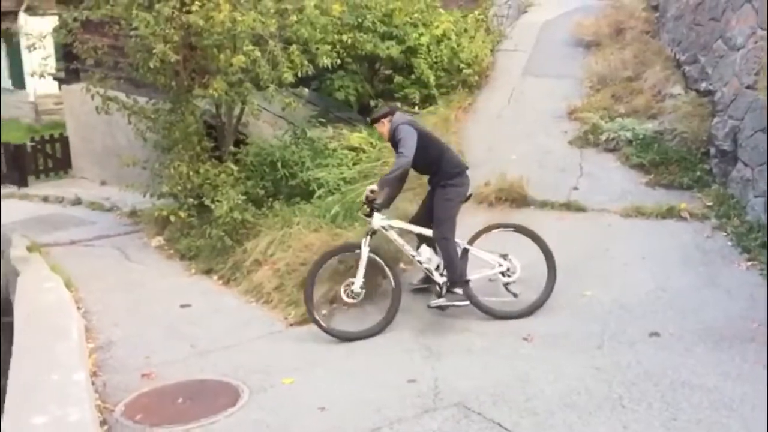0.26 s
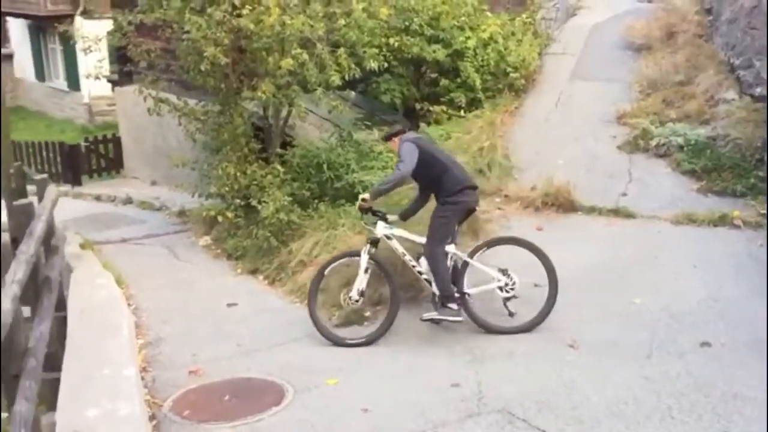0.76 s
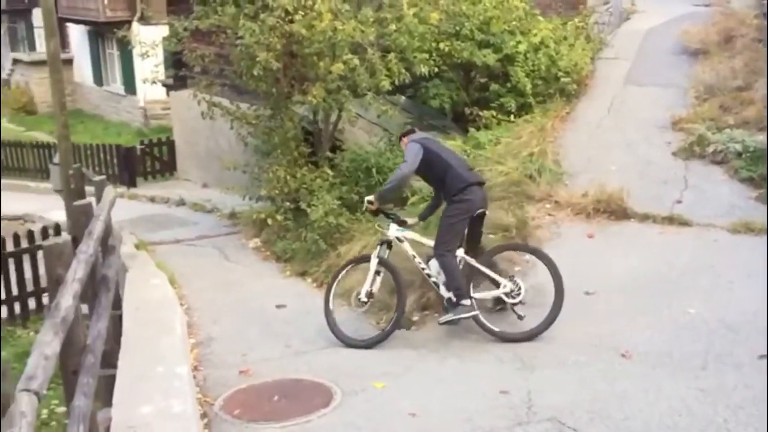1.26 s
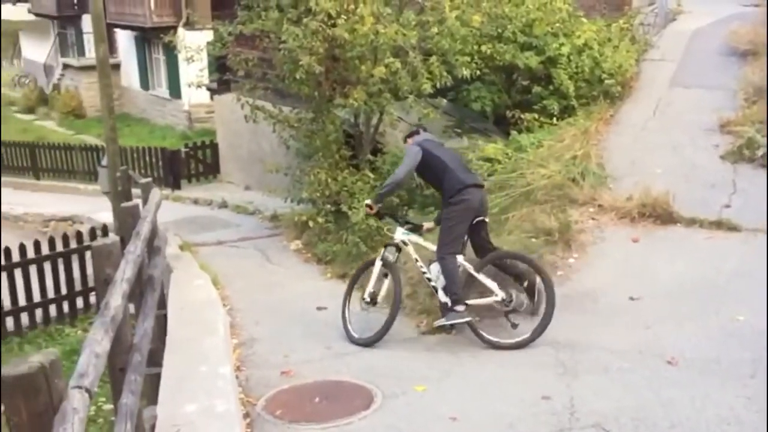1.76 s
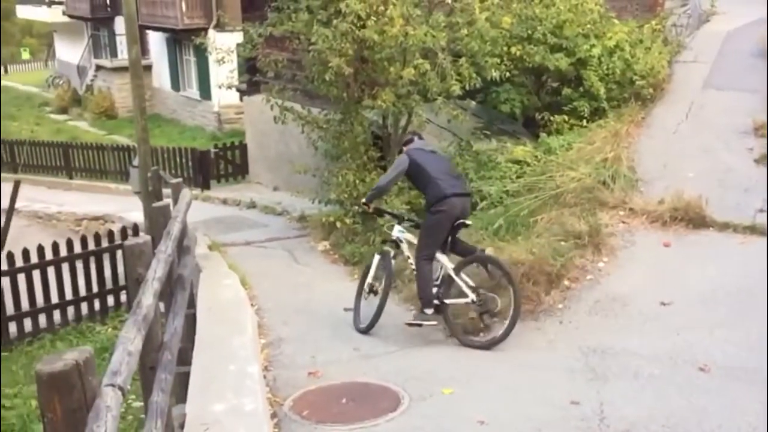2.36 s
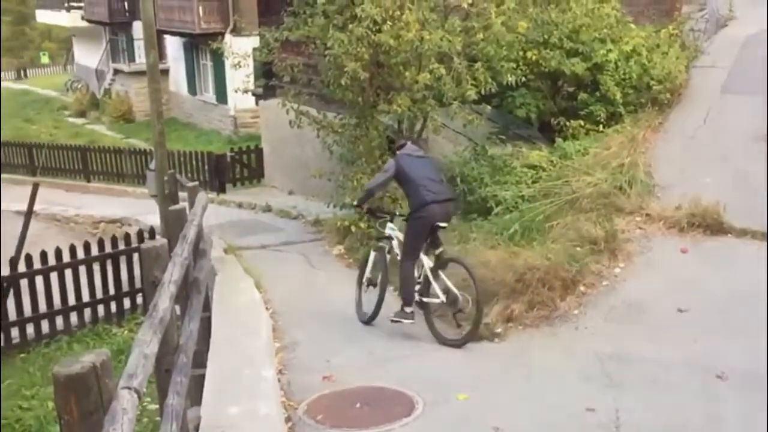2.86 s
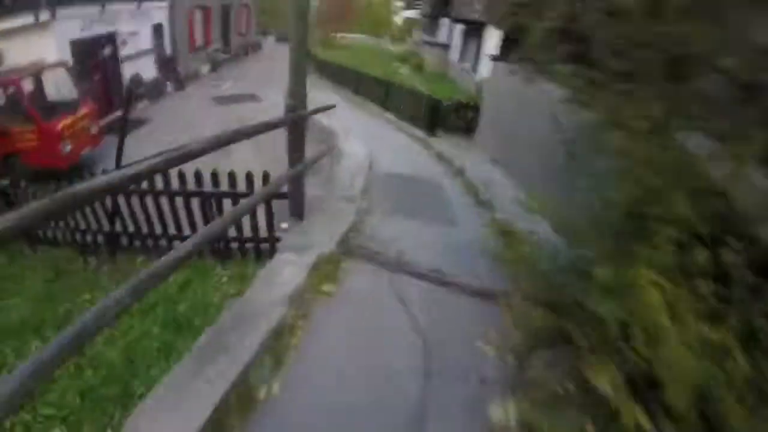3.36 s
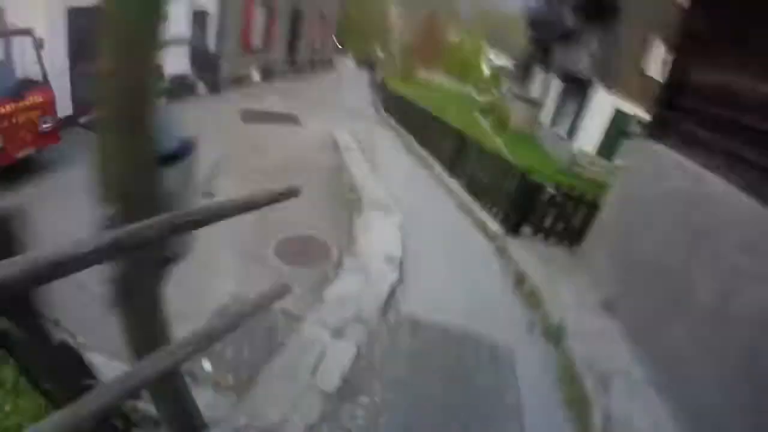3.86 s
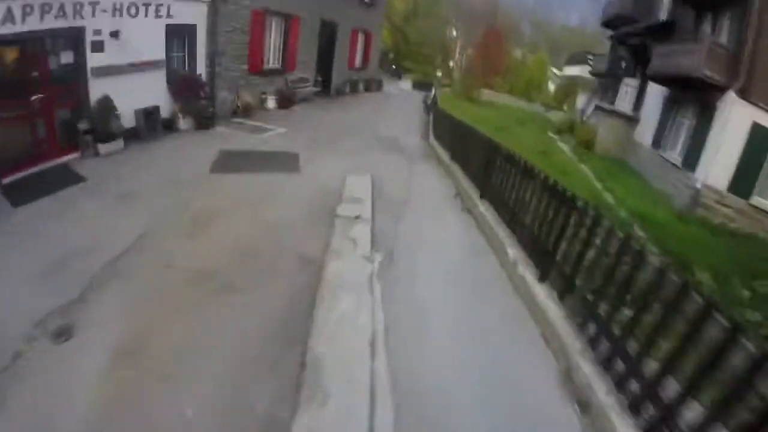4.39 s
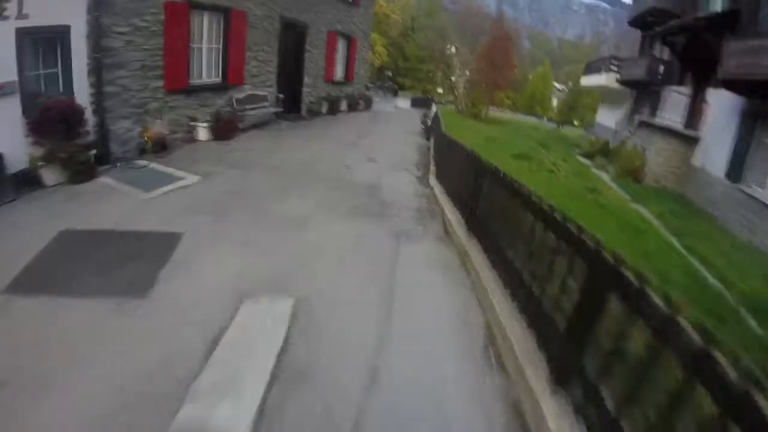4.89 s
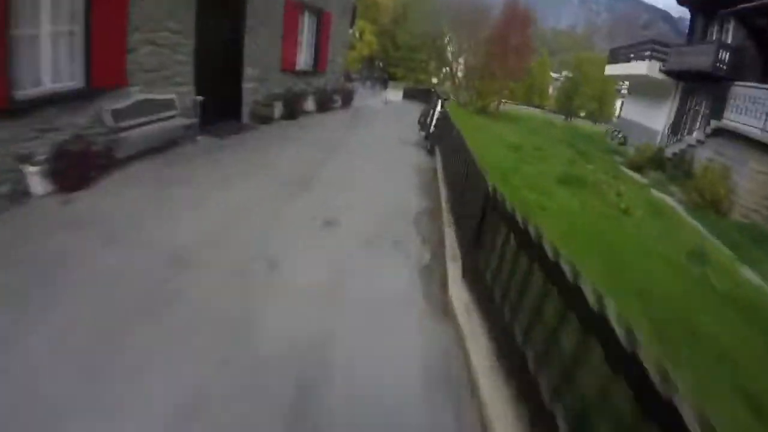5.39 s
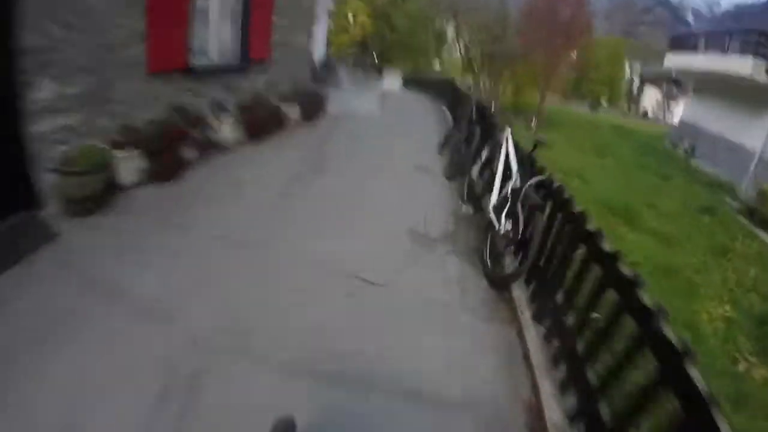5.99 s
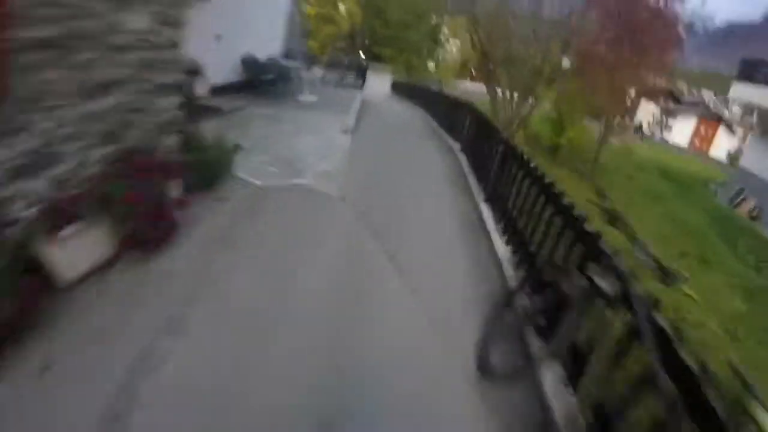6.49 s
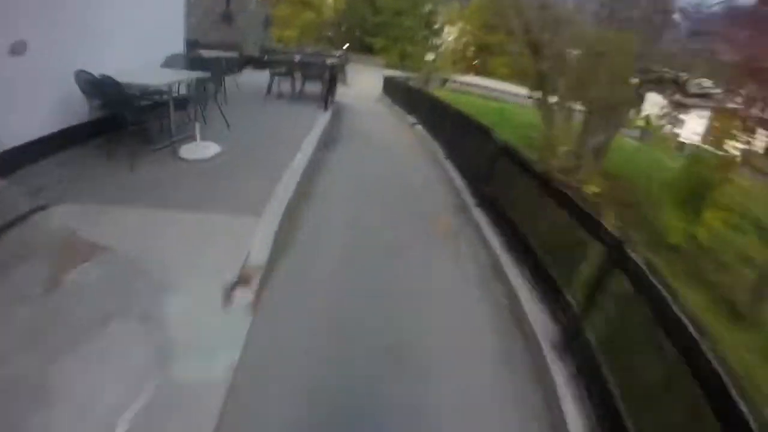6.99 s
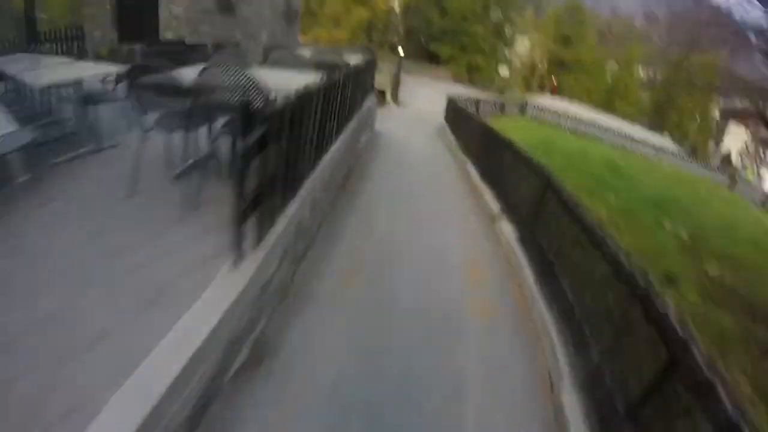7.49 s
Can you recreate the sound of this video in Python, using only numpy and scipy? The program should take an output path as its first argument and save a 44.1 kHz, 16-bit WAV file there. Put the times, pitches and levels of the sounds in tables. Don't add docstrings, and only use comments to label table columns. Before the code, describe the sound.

A mountain bike turns with muffled grinding, knocks and metallic clangs, then low thumps, thin hiss and plasticky clicks shake a housed microphone rolling downhill.

```python
import sys
import numpy as np
from scipy import signal
from scipy.io import wavfile
from scipy.ndimage import uniform_filter1d

SR = 44100
rng = np.random.default_rng(int(sys.argv[2]) if len(sys.argv) > 2 else 0)


def amp(db):
    return 10 ** (np.asarray(db, float) / 20)


def write(x):
    x = np.atleast_2d(x).T
    wavfile.write(sys.argv[1], SR, np.round(np.clip(x, -1, 1) * 32767).astype(np.int16))


N = 341364
LEAD_SAMPLES = 130


def rms_one(x):
    return x / np.sqrt(np.mean(x ** 2) + 1e-20)


def in_time(rows):
    s, *columns = np.transpose(rows)
    return [np.interp(np.arange(N) / SR, s, c) for c in columns]


def swells(rows, length_s):
    s, *columns = np.transpose(rows)
    coarse_s = np.arange(0, N, 40) / SR
    bells = np.exp(-.5 * ((coarse_s - s[:, None]) / length_s) ** 2)
    return [np.interp(np.arange(N) / 40, np.arange(len(coarse_s)), c @ bells) for c in columns]


def at_hz(points, hz):
    table_hz, table_db = np.transpose(points)
    return np.interp(np.log(hz), np.log(table_hz), table_db)


def drift(rate_hz):
    r = np.exp(-80 * np.pi * rate_hz / SR)
    slow = signal.lfilter([1], [1, -2 * r, r * r], rng.standard_normal(N // 40 + 2002))[2000:]
    return np.interp(np.arange(N) / 40, np.arange(len(slow)), rms_one(slow))


def band(x, low_hz, high_hz):
    return signal.sosfilt(signal.butter(2, [low_hz, high_hz], "band", fs=SR, output="sos"), x)


def resonance(x, hz, width_hz):
    r = np.exp(-np.pi * width_hz / SR)
    poles = [1, -2 * r * np.cos(2 * np.pi * hz / SR), r * r]
    return signal.lfilter([(1 - r * r) / 2, 0, (r * r - 1) / 2], poles, x)


def twice_resonant(x, hz, width_hz):
    return resonance(resonance(x, hz, width_hz), hz, width_hz)


def modes(x, table):
    return sum((-1) ** k * amp(db) * resonance(x, hz, width_hz) for k, (hz, width_hz, db) in enumerate(table))


def struck(x, hz, t60_s):
    r, w = amp(-60 / (t60_s * SR)), 2 * np.pi * hz / SR
    return signal.lfilter([0, np.sin(w)], [1, -2 * r * np.cos(w), r * r], x)


def grit(per_s, spread_db):
    sizes = amp(spread_db * np.minimum(rng.exponential(1, N), 5)) * rng.choice([-1, 1], N)
    return rms_one(sizes * (rng.random(N) < per_s / SR))


def coloured(sources, spectrum, patchy_db, flicker_hz):
    low_end, high_end = spectrum[0][0], spectrum[-1][0]
    edges = np.geomspace(low_end, high_end, round(3 * np.log2(high_end / low_end)))
    together = drift(flicker_hz)
    for k, (low, high) in enumerate(zip(edges, edges[1:])):
        hz = np.sqrt(low * high)
        level_db = at_hz(spectrum, hz) + patchy_db * (0.47 * together + drift(flicker_hz))
        yield hz, amp(level_db) * band(sources[k % 2], low, high)


def snap(t60_s, lead_swell, hit, stop=1):
    t = (np.arange(6000) - LEAD_SAMPLES) / SR
    t60_s = np.clip(t60_s, .004, .15)
    envelope = np.where(t < 0, lead_swell * np.exp(t / 0.0018), amp(-60 * np.abs(t / t60_s) ** stop))
    crack = rng.standard_normal(len(t)) * envelope
    crack[LEAD_SAMPLES] += hit
    return crack


def add(out, s, burst, db):
    at = round(s * SR) - LEAD_SAMPLES
    out[at:at + len(burst)] += amp(db) * burst[:N - at] / np.max(np.abs(burst))


# t/s, level/dB
SCRUB = [(0.0, -24.5), (0.1, -36.5), (0.14, -29.5), (0.35, -32.5), (0.52, -26.5), (0.66, -29),
         (0.79, -42.5), (0.85, -29), (1.0, -42.5), (1.3, -51.5), (1.46, -43.5), (1.75, -54.5),
         (1.88, -41.5), (1.98, -38.5), (2.1, -49), (2.57, -57), (2.75, -50.5), (3.45, -72.5)]
# f/Hz, level/dB per Hz
SCRUB_COLOUR = [(70, 5), (120, 5.5), (220, 9), (400, 0.5), (700, 4), (1200, -5.5), (2000, -7.5),
                (3000, -11.5), (4300, -24.5), (5200, -39.5)]
# level/dB at a scrub of -40 dB, share of its swing
SCRUB_LAYERS = [
    (-38.5, 0.76),
    (-40.5, 1),
    (-49, 0.96),
    (-50, 0.88),
]
# t/s, level/dB above scrub
BOOMS = [(0.01, 6), (0.21, 1.5), (0.49, 6), (0.54, 7.5), (0.64, 7.5), (0.86, -9.5), (0.98, 6.5),
         (1.08, 11.5), (1.13, 5.5), (1.55, -11.5), (1.76, 2), (1.95, 4.5), (2.46, 7.5), (2.95, 7.5),
         (3.04, 6.5), (3.12, 3)]
# t/s, level/dB above scrub
SCRAPES = [
    (0.92, -1),
    (1.72, -2),
    (1.9, -2),
    (2.0, 4),
    (2.05, 1),
    (2.45, 3),
    (2.57, -3),
    (2.7, -5),
    (2.81, -10),
]


def tyres():
    sources = [0.6 * rng.standard_normal(N) + 0.61 * grit(900 * amp(4 * drift(15)), spread_db=0.0)
               for _ in range(2)]
    layers = np.zeros((4, N))
    for hz, part in coloured(sources, SCRUB_COLOUR, patchy_db=1.22, flicker_hz=17.4):
        layers[np.searchsorted([400, 1200, 2200], hz)] += part
    layers = [rms_one(layer) for layer in layers]
    layers[0] *= amp(swells(BOOMS, length_s=0.014)[0])
    layers[3] *= amp(swells(SCRAPES, length_s=0.021)[0])
    swing_db = in_time(SCRUB)[0] + 40
    return sum(amp(db + share * swing_db) * layer for (db, share), layer in zip(SCRUB_LAYERS, layers))


# t/s, peak level/dB
SPITS = [(0.0034, -46.5), (0.4873, -46.5), (0.492, -56), (0.566, -66), (0.5704, -60), (0.577, -59.5),
         (0.6587, -55), (0.687, -51.5), (1.0895, -49.5), (1.125, -57.5), (1.588, -64)]
# t/s, level/dB
WHINE_SWELLS = [
    (2.25, 3),
    (2.62, 5),
    (1.9, -2.5),
    (2.87, -7),
]


def close_grit():
    t = np.arange(N) / SR
    whine_db = -100.5 + 3 * t + 3 * drift(6.) + swells(WHINE_SWELLS, length_s=.08)[0]
    whine = resonance(resonance(rng.standard_normal(N), 6200, 600), 6000, 600)
    out = amp(whine_db) * rms_one(whine)
    out += amp(-90.5) * rms_one(band(rng.standard_normal(N), 5200, 12600))
    haze, = swells([(s, amp(.5 * db)) for s, db in SPITS], length_s=.025)
    out += amp(-62) * haze * rms_one(band(rng.standard_normal(N), 4700, 8500))
    for s, db in SPITS:
        crack = snap(.012, lead_swell=.5, hit=3.)
        add(out, s, band(crack, 4800, 8200) + .5 * band(crack, 8000, 12500), db)
    return out


# f/Hz, level/dB per Hz
TURN_SHAKE_COLOUR = [(12, -11.5), (20, 5.5), (35, 4), (60, 4.5), (85, -12)]
# f/Hz, level/dB per Hz
SHAKE_COLOUR = [(12, 18), (20, 3), (35, -3), (55, -9.5), (80, -19), (150, -19.5), (350, -37.5)]
# t/s, level/dB, direction, swing f/Hz, length/s
JOLTS = [(0.176, -27.5, 0.83, 69, 0.029), (1.958, -28.5, -1.2, 62, 0.0064),
         (1.981, -13.5, -0.7, 153, 0.0023), (3.728, -29.5, -0.87, 22.5, 0.029),
         (3.786, -21.5, -1.1, 26, 0.014), (3.81, -20.5, 1, 27, 0.0053), (3.839, -22.5, -0.99, 22, 0.012),
         (4.224, -25, -1.3, 11.5, 0.035), (3.935, -24.5, -1.1, 23.5, 0.028), (4.284, -9.5, 1, 14., .009),
         (4.2955, -16, 1, 60., .002), (4.3068, -.3, -1, 43., .0088), (4.327, -14, -1, 40., .005),
         (4.2985, -27, -1, 200., .002), (4.378, -15, 0.78, 18, 0.014), (5.067, -21, -1.36, 30, 0.017),
         (5.387, -19.5, 0.66, 17.4, 0.025), (5.43, -13.5, -0.85, 23.5, 0.008),
         (5.493, -18, 0.88, 16, 0.026), (5.941, -33, -1.5, 15, 0.044), (6.011, -28.5, 1, 13, 0.029),
         (6.156, -31.5, -0.96, 20, 0.0097), (6.238, -31, -0.94, 14.6, 0.043), (6.398, -33, 0.76, 15, 0.026)]


def shaking():
    def sway(colour):
        noises = rng.standard_normal((2, N))
        return rms_one(sum(part for _, part in coloured(noises, colour, patchy_db=1.2, flicker_hz=8.)))

    t = np.arange(N) / SR
    ride_share = np.clip((t - 2.9) / .5, 0, 1)
    turn_db = -44 + 0.29 * (in_time(SCRUB)[0] + 40)
    ride_db = np.minimum(-43 + 0.96 * (in_time(ROAD)[0] + 65), -27)
    out = np.sqrt(1 - ride_share) * amp(turn_db) * sway(TURN_SHAKE_COLOUR)
    out += np.sqrt(ride_share) * amp(ride_db) * sway(SHAKE_COLOUR)
    for s, db, direction, hz, length_s in JOLTS:
        near = slice(*np.searchsorted(t, [s - 5 * length_s, s + 5 * length_s]))
        after = t[near] - s
        bell = np.exp(-.5 * (after / length_s) ** 2)
        out[near] += direction * amp(db) * bell * np.cos(2 * np.pi * hz * after)
    return out


# t/s, peak level/dB, f/Hz, bright peak level/dB
KNOCKS = [(0.527, -14, 720, -29.5), (0.823, -16, 697, -42.5), (0.844, -10.5, 703, -34),
          (0.973, -26, 636, -35), (1.044, -27, 457, -28.5), (1.079, -29, 466, -53), (1.128, -30, 450, -48),
          (1.351, -32.5, 530, -51), (1.459, -30.5, 600, -48), (1.486, -32.5, 603, -42),
          (1.65, -27, 683, -46), (1.746, -38.5, 985, -55), (1.813, -34.5, 920, -63), (1.863, -26, 870, -35),
          (1.883, -30, 715, -51), (1.935, -25.5, 760, -40), (1.961, -26, 660, -42), (2.624, -40, 890, -50),
          (2.726, -32, 760, -47), (2.755, -33, 945, -47), (2.764, -30, 850, -58),
          (3.036, -42.5, 991, -43.5), (3.303, -46.5, 1030, -70)]
# t/s, peak level/dB, f/Hz, bright peak level/dB
TAPS = [(0.811, -27, 1610, -30), (1.294, -37, 2000, -43.5), (1.437, -29.5, 1600, -34),
        (1.53, -23.5, 2260, -36), (1.628, -40, 1520, -44), (1.795, -50, 2020, -66), (1.949, -29, 2080, -35),
        (2.165, -45, 2150, -36), (2.2, -37, 740, -37), (2.65, -54, 2380, -50), (2.328, -55, 2300, -43),
        (2.36, -38, 880, -36), (2.416, -55, 2300, -45), (2.554, -60, 2300, -57), (2.868, -64, 2300, -51),
        (3.066, -56, 2300, -51), (2.922, -50, 1550, -41)]
# f/Hz, width/Hz, level/dB
CRANK = [(1650, 120, -0.5), (2300, 170, -0.5), (2800, 250, 3.5), (3600, 370, -4), (4070, 290, -12)]
# t/s, peak level/dB, f/Hz
THUDS = [
    (1.6228, -21, 1700),
    (2.6345, -29, 800),
    (2.7515, -22, 900),
    (2.727, -31, 850),
]
# t/s, peak level/dB, f/Hz, t60/s
PINGS = [(0.526, -15, 690, .04), (0.841, -20, 2300, 0.038), (0.85, -30.5, 1650, 0.15),
         (1.797, -34.5, 1980, 0.022), (1.815, -36.5, 1550, 0.028), (2.363, -45, 1640, 0.078),
         (2.589, -60, 2480, .12), (2.647, -39, 2350, .04), (2.662, -45, 2350, .03), (2.757, -32, 980, .06),
         (0.885, -33, 2300, .03), (1.05, -38, 2390, .1), (1.04, -34, 1800, .04), (2.198, -40, 1750, .04),
         (2.163, -38, 4100, .04), (2.765, -47, 1670, 0.033), (2.785, -44, 996, 0.066), (2.8, -49, 950, .05),
         (2.922, -47, 1620, .12), (2.94, -50, 2790, 0.13), (2.72, -39, 1050, .03), (2.62, -44, 950, 0.044),
         (2.64, -43, 700, 0.056), (1.862, -29.5, 1550, 0.033), (2.03, -36.5, 904, .05),
         (2.2, -38, 740, 0.084)]


def knocks():
    out = np.zeros(N)
    for rows, t60_s in ((KNOCKS, 0.097), (TAPS, 0.091)):
        for s, db, hz, bright_db in rows:
            crack = snap(t60_s, lead_swell=0.11, hit=14.8)
            add(out, s, resonance(resonance(crack, hz, .5 * hz), hz, 0.51 * hz), db)
            add(out, s, modes(snap(t60_s, lead_swell=1.0, hit=0), CRANK), bright_db)
    for s, db, hz in THUDS:
        blow = resonance(resonance(snap(.02, lead_swell=0, hit=30), hz, .6 * hz), hz, .8 * hz)
        add(out, s, band(blow, .5 * hz, 1.4 * hz), db)
    for s, db, hz, t60_s in PINGS:
        add(out, s, struck(snap(0.94 * t60_s, lead_swell=.3, hit=2.5), hz, .6 * t60_s), db)
    return out


# t/s, level/dB above the mode levels, share of the free ring time
CLANGS = [
    (0.841, 0, 1.),
    (1.531, 0, 1.),
    (2.1612, -1, 1.),
    (1.039, -13, .3),
    (2.361, -18, .3),
    (2.924, -20, .3),
]
# t/s, level/dB
RING_DROPS = [
    (2.218, -6),
    (2.27, -8),
    (1.0, -6),
]
# f/Hz, level/dB, t60/s
STAY_LOW = [(2498, -31, .6), (2531, -31, .55), (2795, -23, .24), (2841, -24, .12), (3090, -34, .2),
            (3430, -33, .09), (2960, -30, .04)]
STAY_MIDDLE = [(2499, -28, .38), (2670, -35, .12), (2770, -29, .08), (3030, -34, .12), (3075, -41, .2),
               (3637, -34, .05), (2250, -35, .04)]
STAY_HIGH = [(2497, -31, .5), (2536, -36, .45), (2640, -34, .22), (2675, -30, .2), (2786, -26, .09),
             (2806, -30, .22), (3026, -35, .15)]


def chain():
    out = np.zeros(N)
    stays = (STAY_LOW, STAY_MIDDLE, STAY_HIGH, STAY_LOW, STAY_LOW, STAY_LOW)
    for (s, db, free), stay in zip(CLANGS, stays):
        ring = 0
        for k, (hz, mode_db, t60_s) in enumerate(stay):
            chatter = snap(.02, lead_swell=0, hit=24., stop=2) + .45 * snap(.15 * free, lead_swell=0, hit=0)
            late = np.roll(np.pad(chatter, (0, 14000)), round(k * .0005 * SR))
            swing = struck(late, hz, t60_s * free)
            ring = ring + amp(mode_db) * swing / np.max(swing)
        t = s + (np.arange(len(ring)) - LEAD_SAMPLES) / SR
        damping_db = sum(drop_db * np.clip((t - at) / .01, 0, 1) for at, drop_db in RING_DROPS if at > s)
        out[round(s * SR) - LEAD_SAMPLES:][:len(ring)] += ring * amp(db + damping_db)
    return out


# t/s, level/dB
ROAD = [(3.0, -71), (3.4, -65), (3.6, -61.5), (3.82, -57), (4.1, -65), (4.25, -52), (4.45, -61),
        (4.65, -64), (4.9, -64), (5.05, -60), (5.25, -59), (5.45, -56), (5.65, -64.5), (6.1, -64),
        (6.3, -66.5), (6.7, -68.5), (7.4, -68.5), (7.74, -73)]
# t/s, level/dB above road, upper part level/dB above that
CHATTER = [(3.47, 4.5, -1), (3.73, 3, 0), (3.78, -3, 6), (3.96, 4.5, 4.5), (4.16, 3, 1.5), (4.28, 2, 4.5),
           (4.44, 10, -1.5), (4.49, -2.5, 7.5), (4.55, 4.5, 1), (4.98, 8.5, -12), (5.12, 8.5, 4),
           (5.26, -14, -3), (5.305, 2.5, 3.5), (5.37, -5, 11), (5.45, -10.5, 11.5), (5.53, 5, 4),
           (5.99, 3.5, 1), (6.05, 4.5, 0), (6.4, 4.5, 1), (6.19, 4, -3)]
# f/Hz, width/Hz, level/dB
HOUSING = [(1290, 163, 1.5), (1590, 80, 8), (2150, 220, 6.5), (2678, 250, 8), (3120, 320, 3.5),
           (4260, 370, -10.5), (6170, 240, -7.5)]
# f/Hz, level/dB per Hz
HISS = [(35, -45), (60, -2.5), (199, -2.5), (338, -5.5), (478, -9), (1000, -10.5), (1150, -12.5),
        (1550, -27), (1700, -14.5), (4690, -23), (15600, -37.5)]


def ride():
    t = np.arange(N) / SR
    road_db = in_time(ROAD)[0]
    loose_db, upper_db = swells(CHATTER, length_s=0.015)
    buzz = .7 * rng.standard_normal(N) + .4 * grit(800 * amp(3 * drift(25)), spread_db=3.5)
    rattle = rms_one(modes(buzz, HOUSING[:2]))
    rattle = rattle + amp(-3.5 + upper_db) * rms_one(modes(buzz, HOUSING[2:]))
    hiss = sum(part for _, part in coloured(rng.standard_normal((2, N)), HISS, patchy_db=.6, flicker_hz=9.6))
    hiss = hiss / np.std(band(hiss, 4200, 15000))
    hiss_db = -71.5 + 0.21 * (road_db + 65) + 10.5 * np.minimum(t - 3.74, 0)
    return amp(road_db + loose_db + 2.0) * rattle + amp(hiss_db) * hiss


def brake():
    t = np.arange(N) / SR
    level_db = -52.5 + 151 * np.minimum(t - 2.94, 0) - 110 * np.maximum(t - 3.12, 0)
    return amp(level_db) * rms_one(twice_resonant(rng.standard_normal(N), 373, 55))


# t/s, peak level/dB, f/Hz, bright peak level/dB, reach f/Hz
CLICKS = [(3.9325, -59, 2600, -42, 12900), (3.936, -27.5, 2300, -38, 9000), (3.988, -38, 1500, -48, 6500),
          (4.0263, -33, 1600, -34, 8140), (4.0305, -44, 1380, -54, 7000),
          (4.249, -28.5, 1590, -29.5, 18700), (4.24, -38, 2700, -42, 8000), (4.272, -32, 1290, -41, 14000),
          (4.2972, -19, 2520, -24, 13000), (4.3005, -21, 2100, -27, 12000), (4.399, -38, 1500, -49, 5500),
          (4.343, -39, 2140, -42, 8000), (4.357, -32, 1560, -34, 8000), (4.408, -31, 1460, -30, 9000),
          (5.1023, -31.5, 2600, -38, 12000), (5.1057, -27.5, 2420, -33.5, 11000),
          (5.1626, -54, 1590, -52, 14000), (5.1767, -27.5, 2500, -31, 12000),
          (5.3528, -35.5, 1290, -40, 14000), (5.3782, -53, 1330, -48, 10000),
          (5.4181, -27, 2550, -32.5, 13000), (5.4657, -24.5, 2740, -30, 13000),
          (5.5044, -30.5, 3150, -32, 12000), (5.510, -35, 2680, -37, 14000), (5.358, -46, 1500, -43, 12000),
          (6.0011, -37, 2150, -40, 7400), (4.255, -32, 2700, -36, 18800), (4.263, -39, 2700, -45, 14000),
          (4.413, -35.5, 3100, -44, 11000)]
# t/s, peak level/dB, f/Hz
TICKS = [
    (3.7152, -44, 2300),
    (3.7828, -44, 1280),
    (4.197, -39, 1620),
    (5.296, -49, 2440),
    (5.94, -41.5, 1500),
    (6.0404, -44, 1540),
    (6.1826, -47, 1260),
    (6.8435, -36, 1500),
    (6.865, -33, 2200),
]
# t/s, peak level/dB, f/Hz
BUMPS = [
    (3.4507, -42.5, 1350),
    (3.8203, -36, 1550),
    (3.894, -42, 1300),
    (4.298, -25, 1030),
    (5.092, -34, 1200),
    (5.5199, -43, 1580),
]
LATCH = [(4480, 280, 2), (6230, 310, 7.5), (7080, 670, -4), (9970, 2000, -2.5), (11800, 3900, -6.5)]
# t/s, level/dB, f/Hz, t60/s
LATCH_PINGS = [(4.254, -50, 10050, 0.05), (4.409, -43, 6200, 0.04), (4.2495, -33, 4600, .015),
               (4.203, -40, 1600, .05), (4.366, -42, 1600, .03), (4.376, -39, 1620, .04),
               (3.722, -41, 1560, .03), (3.785, -45, 2450, .02), (3.8, -48, 2900, .015),
               (3.743, -48, 3050, .015), (3.963, -47, 2600, .02), (4.409, -37, 2900, .025),
               (5.178, -29, 2500, 0.024), (5.4675, -25.5, 2640, .022), (5.419, -29, 2550, 0.014),
               (5.507, -41, 6200, .012), (5.352, -50, 6600, .015), (3.9325, -40, 11500, .008),
               (6.8445, -42.5, 3000, .015), (6.866, -43, 3250, 0.02)]


def clicks():
    out = np.zeros(N)
    # t/s, level/dB, f/Hz, t60/s, bright level/dB, dull level/dB, reach f/Hz, swell before the hit
    contacts = [(s, db, hz, .053, bright_db, db - 18, reach_hz, .88) for s, db, hz, bright_db, reach_hz in CLICKS]
    contacts += [(s, db, hz, .051, db - 29, db - 29, 9000, .027) for s, db, hz in TICKS]
    contacts += [(s, db, hz, .028, db - 23, db + 1.5, 9000, .027) for s, db, hz in BUMPS]
    for s, db, hz, t60_s, bright_db, dull_db, reach_hz, lead_swell in contacts:
        s = s + .001
        crack = snap(.5 * t60_s, lead_swell=lead_swell, hit=9.4, stop=1.025)
        tick = modes(crack, HOUSING) + amp(12.5) * resonance(crack, hz, 230)
        add(out, s, band(band(tick, 1000, 4200), 800, 4800), db)
        bright = band(modes(crack, LATCH) + .5 * band(crack, 3000, 9000) + .085 * crack, 4000, 15500)
        bright = band(bright, .2 * reach_hz, min(reach_hz, 20000))
        damping = amp(-60 * np.maximum(np.arange(len(crack)) - LEAD_SAMPLES, 0) / SR / .035)
        add(out, s, damping * bright, bright_db)
        add(out, s, band(band(crack, 100, 450), 80, 800), dull_db)
    for s, db, hz, t60_s in LATCH_PINGS:
        add(out, s, struck(snap(t60_s, lead_swell=.8, hit=2.6), hz, .7 * t60_s), db)
    return out


def scene():
    t = np.arange(N) / SR
    turn = (tyres() + chain() + knocks() + brake()) * np.clip((3.55 - t) / 0.1, 0, 1)
    turn = signal.sosfilt(signal.ellip(10, .5, 70, 4480, fs=SR, output="sos"), turn)
    turn += close_grit() * np.clip((3.5 - t) / .5, 0, 1)
    downhill = ride() * np.clip((t - 2.7) / .4, 0, 1) + clicks()
    return (turn + downhill + shaking())[None]


# t/s, length/s
TOP_GAPS = [(3.78, .02), (3.87, .05), (4.17, .06), (4.33, .05), (5.05, .035), (5.13, .02), (5.37, .03),
            (5.43, .02), (5.9, .1), (6.235, .025), (6.835, .04)]
# f/Hz, level/dB
LEAST_KEPT = [(12500, -30), (12900, -1.5), (13600, .5), (14300, -1.5), (14900, -.5), (15150, 4),
              (15400, 14)]


def thin_top(x):
    hz, s, cells = signal.stft(x, SR, nperseg=1024)
    power = uniform_filter1d(uniform_filter1d(np.abs(cells) ** 2, size=4, axis=1), size=2, axis=2)
    usual = uniform_filter1d(np.log(power + 1e-20), size=141, axis=2)
    usual = np.exp(uniform_filter1d(usual, size=9, axis=1))
    in_gap = sum((s > at) & (s < at + length_s) for at, length_s in TOP_GAPS) * (hz[:, None] > LEAST_KEPT[1][0])
    least_db = at_hz(LEAST_KEPT, hz + 1)[:, None] + 13 * in_gap
    cells *= np.where(power > usual * amp(2 * least_db), 1, amp(-30))
    return signal.istft(cells, SR, nperseg=1024)[1][:, :N]


def band_limit(x):
    return signal.sosfilt(signal.butter(12, 15900, fs=SR, output="sos"), x)


def record(dry):
    dry = signal.sosfilt(signal.ellip(8, .5, 60, 15900, fs=SR, output="sos"), dry)
    mix = thin_top(dry)
    return band_limit(mix)


dry = scene()
out = record(dry)
write(out)
```